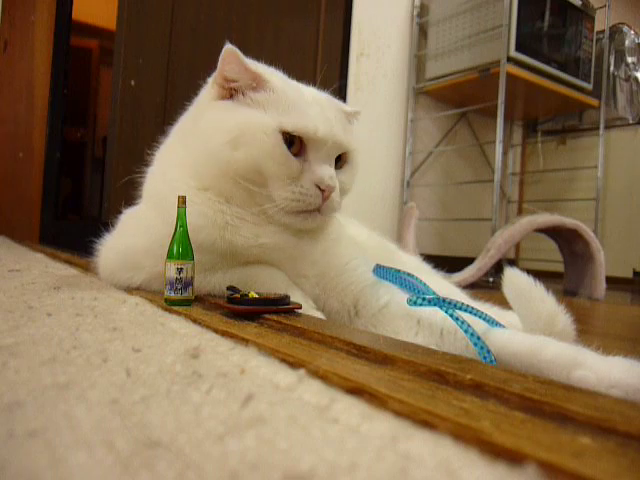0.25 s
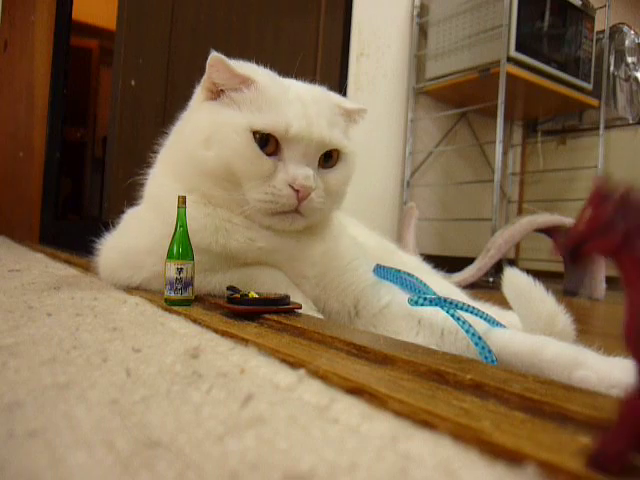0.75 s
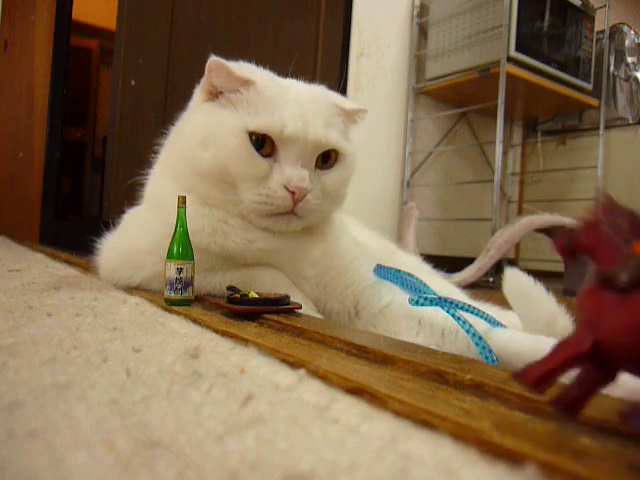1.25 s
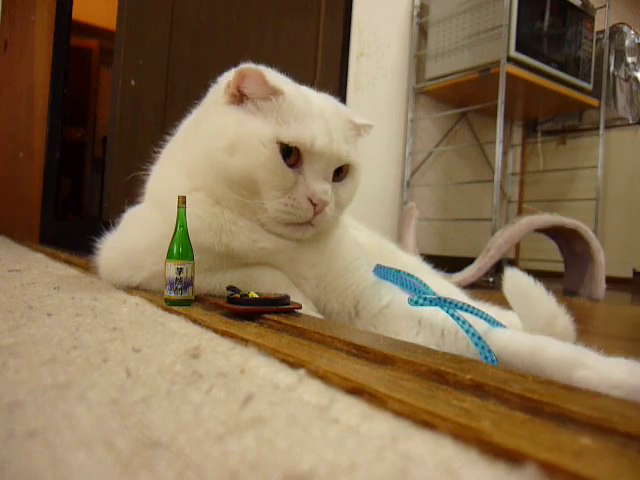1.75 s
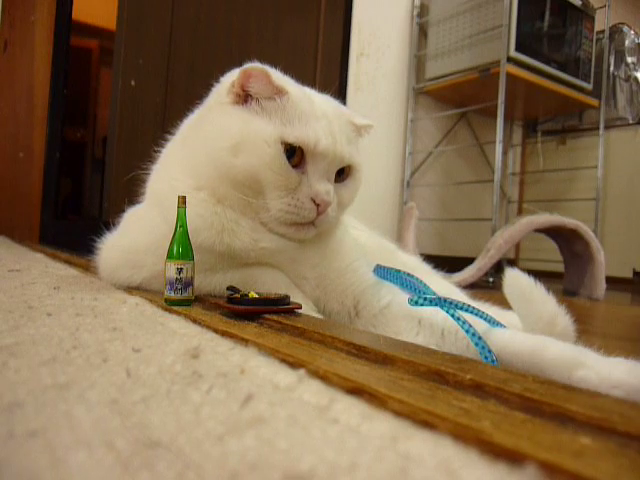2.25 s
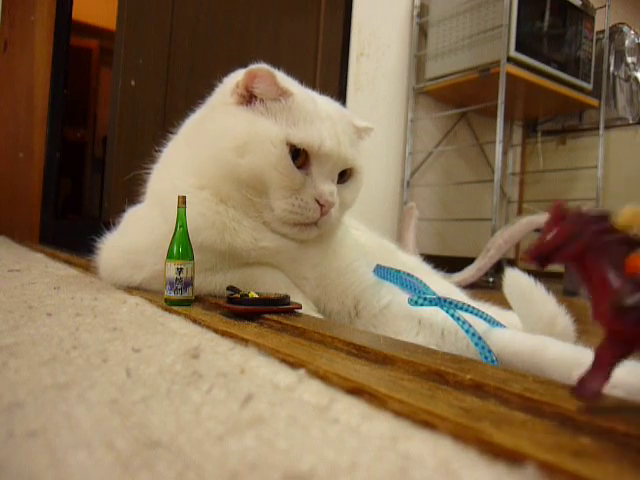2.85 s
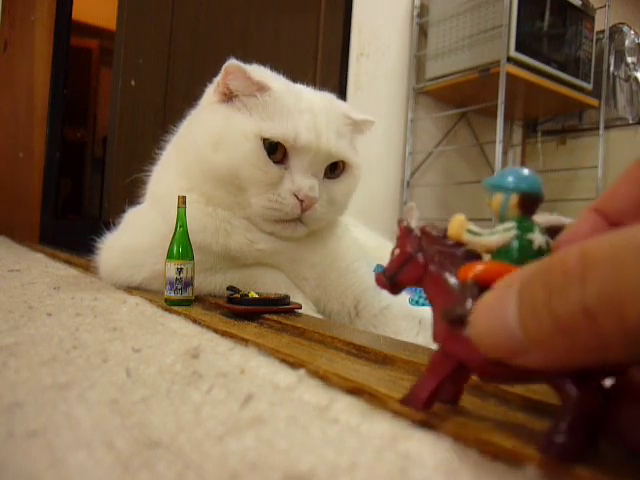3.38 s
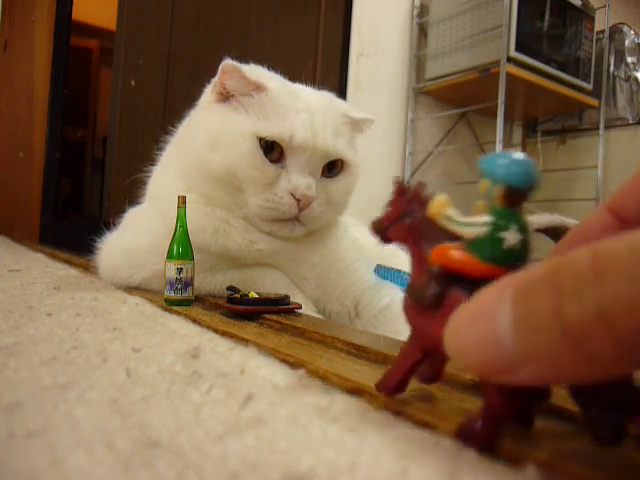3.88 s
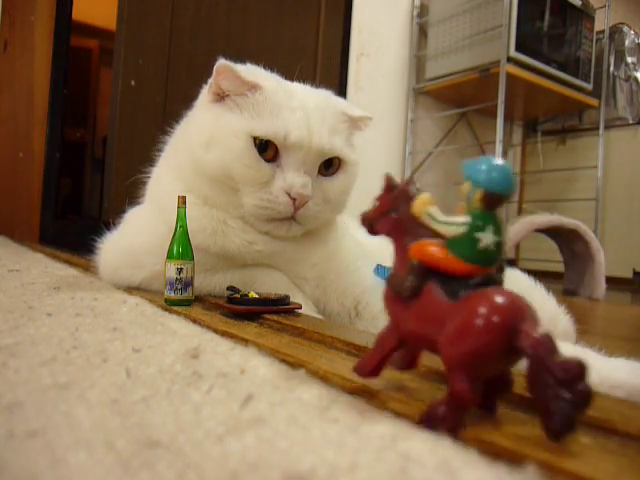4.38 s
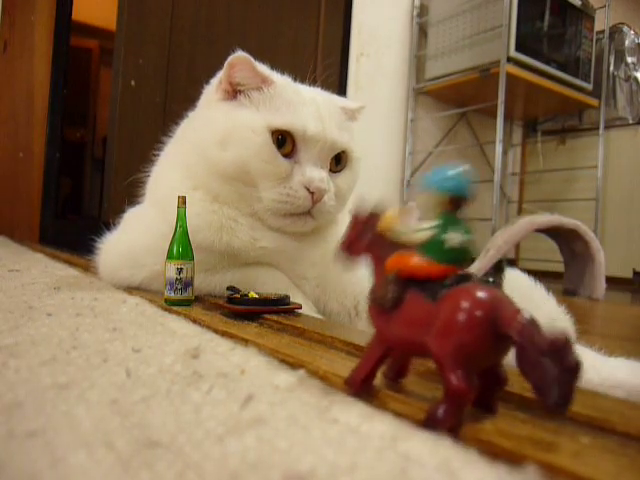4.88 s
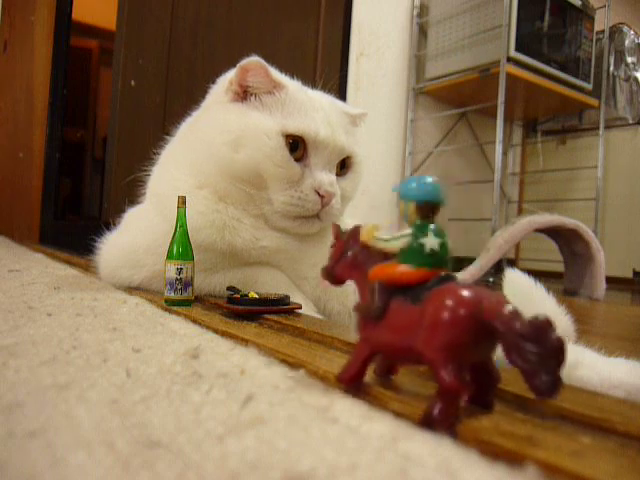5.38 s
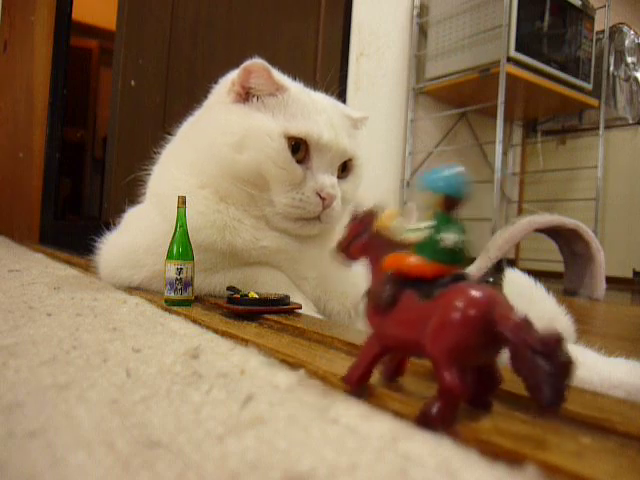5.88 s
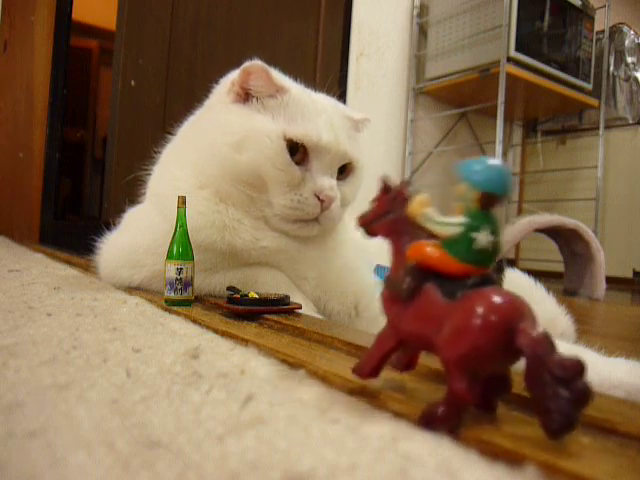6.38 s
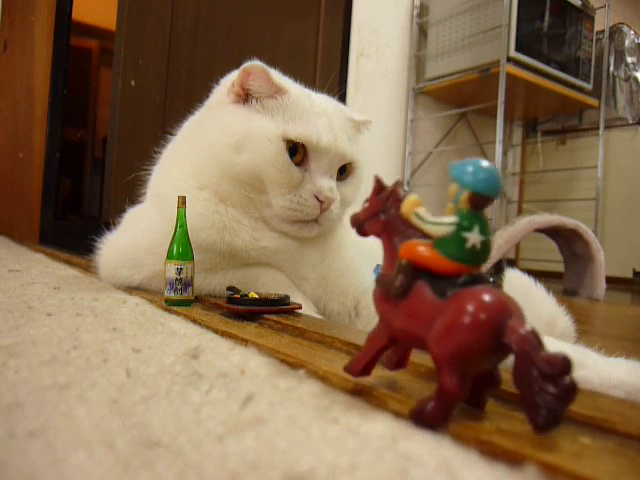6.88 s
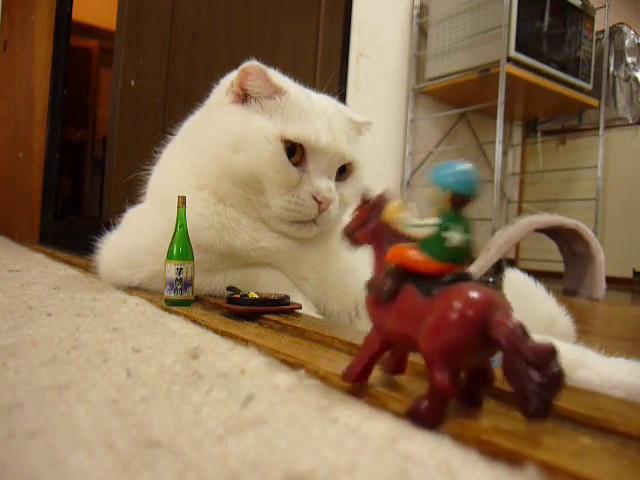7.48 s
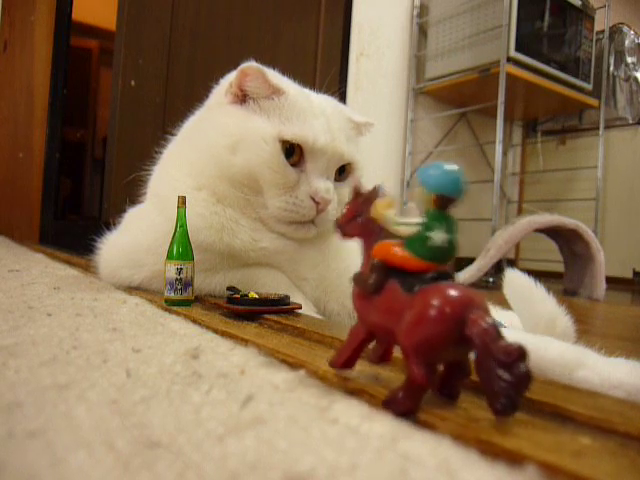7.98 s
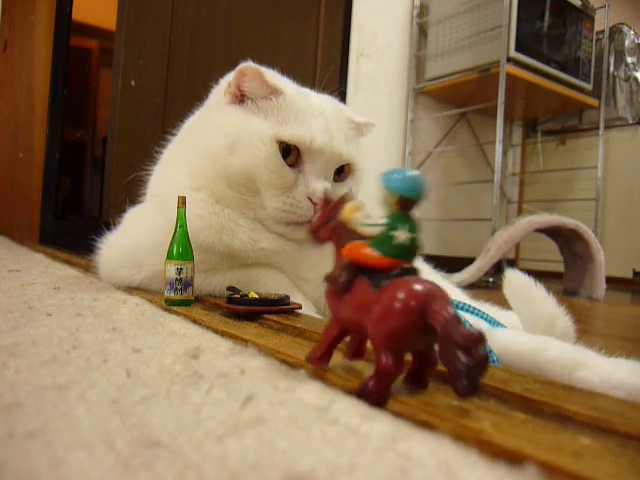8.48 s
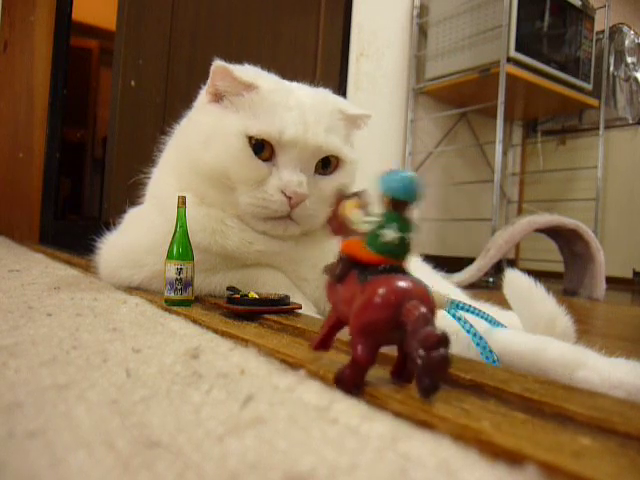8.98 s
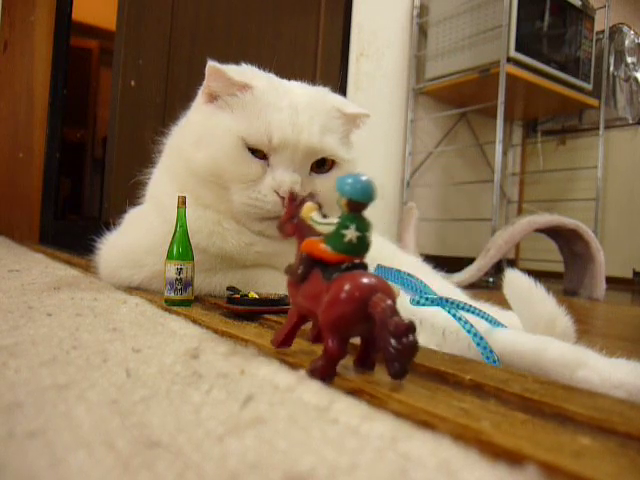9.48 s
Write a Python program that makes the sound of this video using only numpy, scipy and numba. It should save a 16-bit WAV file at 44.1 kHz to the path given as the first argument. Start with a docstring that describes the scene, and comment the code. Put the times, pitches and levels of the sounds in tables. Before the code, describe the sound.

In a small room with a low fan-like rumble and faint hum, a wind-up plastic horse is put on a wooden board, rattling and knocking over with hard clacks. After a quieter pause with light scrapes and handling clicks, it starts hopping in a rapid, slightly uneven rhythm, each hop a dull catch, two bright ticks and a woody tap. Close camera microphone, dull treble, light hiss.

```python
"""A clockwork toy horse is set down, knocked over, set down again and hops along a wooden board near a camera.
Its plastic works tick as short swelling tones of the shell; its hooves tap the board as bursts of tiny contacts.
Faint gears, scrapes and slow floor jolts join in, and the room answers with a fading noise tail.
Under it lie a fan-like rumble of shaped noise and a mains hum; the camera turns these down after loud hits.
It also dulls the treble and adds its own hiss and a faint whine."""
import sys
import numpy as np
from scipy import signal
from scipy.fft import rfft, irfft
from scipy.io import wavfile
from scipy.ndimage import uniform_filter1d
from numba import njit

SR = 44100
rng = np.random.default_rng(int(sys.argv[2]) if len(sys.argv) > 2 else 0)


def pcm_store(signal):
    """Save signal as 16-bit PCM."""
    levels = np.round(np.clip(np.atleast_2d(signal), -1, 1) * 32767)
    wavfile.write(sys.argv[1], SR, levels.astype(np.int16).T)


N = 429534  # length of the scene in samples

# The tones of the plastic shell. Each row: pitch in Hz, level in dB, swell time as a share of the push,
# share of the brightness that it takes (0 to 1).
SHELL_MODES = [(1136, -5.5, 1.4, 0.88), (1527, -6.5, 0.48, 0.025), (1879, -2.5, 0.89, 0.062),
               (2094, 1, 1.345, 0), (2421, 2.5, 0.92, 0.94), (2712, -2.5, 0.48, 0.099),
               (3066, -7, 1.8, 0.94), (3322, 7, 0.92, 1), (3707, 3, 0.79, .99), (4032, 1.5, 0.62, 1),
               (4430, -7, 0.44, 0.87), (5440, -12, 0.47, 0.96)]
# The tones of the wooden board. Each row: pitch in Hz, level in dB, time to fade by 60 dB in seconds,
# share of the hardness that it takes (0 to 1).
BOARD_MODES = [(158, -15.5, 0.14, 0.42), (218, -9, 0.036, 0.08), (363, 12.5, 0.015, 0.011),
               (505, 1.5, 0.054, 0.16), (725, 15.5, 0.0094, 0.76), (810, 17, 0.0061, 0.97),
               (1050, -11.5, 0.012, 0.026), (1300, -14.5, .01, 1), (1900, -14.5, 0.0054, 0.58)]
MAIN_HZ = 2090  # reference pitch of the shell's main lower tone


def undb(db):
    """Turns decibels into a plain factor."""
    return 10 ** (np.asarray(db) / 20)


def level(x, db):
    """Scales a sound to an average (rms) level in dB."""
    return x * undb(db) / np.sqrt(np.mean(x ** 2))


def walk(rate):
    """Random values, drawn `rate` times a second and smoothed twice into a wandering curve; spread near 0.3."""
    hold = int(SR / rate)
    steps = np.repeat(rng.standard_normal(N // hold + 1), hold)
    smooth = uniform_filter1d(uniform_filter1d(steps, hold), hold)
    return 0.43 * smooth[:N]


@njit
def follow(x, start, attack, release):
    """Follows the loudness with one rate for rising and another for falling."""
    now, curve = start, np.empty(len(x))
    for i in range(len(x)):
        now += (x[i] - now) * (attack if x[i] > now else release)
        curve[i] = now
    return curve


def blows(events, strike, modes, lag_s):
    """Plays a table of blows at their peak levels; chance changes the tones so that no two blows are alike."""
    out = np.zeros(N + SR)
    for start, peak_db, *touch in events:
        chance = rng.standard_normal((3, len(modes), 1))
        hit = strike(*touch, chance)
        i = int((start + lag_s) * SR)
        out[i:i + len(hit)] += hit * undb(peak_db) / np.abs(hit).max()
    return out[:N]


def rumble():
    """Steady household noise, shaped by pitch, flutters slightly; a wavering sine makes the mains hum."""
    # The colour of the noise. Each row: pitch in Hz, relative level in dB per Hz.
    colour = np.array([(15, -54.5), (25, -15.5), (40, -10.5), (54, -15), (87, -6.5), (150, -1.5),
                       (320, 0.5), (436, -3.5), (466, -5), (711, -3), (794, -7.5), (1080, -7.5),
                       (2060, -15.5), (2810, -16), (3600, -22), (5000, -36.5), (6500, -69), (11000, -120)])
    noise_db, hum_db, hum_hz = -47.5, -64, 59.5  # levels before the flutter
    hz = np.maximum(np.arange(N // 2 + 1) * SR / N, 1)
    shape = undb(np.interp(np.log(hz), np.log(colour[:, 0]), colour[:, 1]))
    noise = irfft(rfft(rng.standard_normal(N)) * shape, N)
    noise = level(noise, noise_db) * undb(0.23 * walk(5.2))
    hum = np.sin(2 * np.pi * hum_hz * np.arange(N) / SR)
    hum = level(hum, hum_db) * undb(0.83 * walk(9))
    return noise + hum


def gain_control(heard, top_db=-45, slope=0.79, attack_s=0.07, release_s=0.49):
    """The camera's gain goes down after loud hits and slowly comes up again."""
    loudness = follow(np.abs(heard), 1e-4, 1 / (attack_s * SR), 1 / (release_s * SR))
    return (1 + loudness / undb(top_db)) ** -slope


def room(x, gap_s=0.0073):
    """Dense reflections, made of fading noise, start after a short gap and die away."""
    t60_s, room_db = 0.33, -11  # time to fade by 60 dB, strength of the reflections
    t = np.arange(SR // 2) / SR
    tail = rng.standard_normal(len(t)) * 1000 ** (-t / t60_s) * (t > gap_s)
    tail /= np.sqrt(np.sum(tail ** 2))
    return undb(room_db) * signal.fftconvolve(x, tail)[:N]


def jolts(hz=36, t60=0.18):
    """Jolts carried through the floor: a low sine heaves for a few slow cycles and dies away."""
    # Each row: start in seconds, level in dB from which the jolt fades.
    jolt_rows = [(0.779, -41), (1.7, -52), (3.289, -61), (3.648, -49)]
    t = np.arange(N) / SR
    out = np.zeros(N)
    for start, db in jolt_rows:
        age = t - start
        fade = (age > 0) * 1000 ** (-np.abs(age) / t60)
        out += undb(db) * np.sin(2 * np.pi * hz * age) * fade
    return out


def scrapes(span=1.35):
    """Drags of plastic over wood and a few very short gritty clicks, made of spiky noise in a broad band."""
    # Each row: start in seconds, length in seconds, average (rms) level in dB before fading, band centre in Hz.
    scrape_rows = [(0.854, 0.037, -53.5, 3000), (1.333, .2, -59, 2540), (1.401, 0.016, -44, 2110),
                   (1.694, 0.0047, -44, 3000), (1.558, 0.079, -44, 2700), (2.207, 0.12, -56, 3040),
                   (2.34, 0.12, -54, 3130), (2.738, 0.079, -50.5, 750)]
    out = np.zeros(N)
    for start, length, db, hz in scrape_rows:
        i, n = int(start * SR), int(length * SR)
        grit = rng.standard_normal(n) ** 5  # a high power leaves a few big spikes
        band = signal.butter(3, [hz / span, hz * span], "band", fs=SR, output="sos")
        coloured = signal.sosfilt(band, grit)
        fade = np.sin(np.pi * np.linspace(0, 1, n) ** .5)  # rises fast, falls slowly
        out[i:i + n] += level(coloured, db) * fade
    return out


def gears(bright_db=-6, ms=0.58):
    """The gear train turns while the spring runs: a dense faint patter of teeth rings the shell."""
    # The loudness over time. Each row: time in seconds, average (rms) level in dB.
    gear_levels = [(.4, -92), (.5, -65), (1, -58), (1.3, -66.5), (1.7, -63), (1.8, -87), (3.4, -91),
                   (3.65, -72.5), (5, -73), (6.5, -76), (8, -75), (9.74, -73)]
    teeth = rng.standard_normal(N) ** 3
    shell = tick(bright_db, MAIN_HZ, np.zeros((3, len(SHELL_MODES), 1)), ms)
    patter = level(signal.fftconvolve(teeth, shell)[:N], 0)
    times, db = np.transpose(gear_levels)
    return patter * undb(np.interp(np.arange(N) / SR, times, db))


def tap(hard_db, ms, touch_db, chance, swell_s=0.00035):
    """A first touch on the board, then a rattle of small contacts that swells and dies; each rings the wood."""
    t = np.arange(SR // 8) / SR
    hz, db, t60, share = np.transpose(BOARD_MODES)[:, :, None]
    hz = hz * (1 + .05 * chance[1])
    gain = undb(db + share * hard_db + 2 * chance[0])
    ring = np.sum(gain * np.sin(2 * np.pi * hz * t) * 1000 ** (-t / t60), axis=0)
    ring *= 1 - np.exp(-t / swell_s)  # softens the onset
    age = t / (ms / 1000)
    rattle = rng.standard_normal(len(t)) ** 5 * age * np.exp(-age)
    rattle /= np.sqrt(np.sum(rattle ** 2))
    rattle[0] = undb(touch_db)  # the first touch
    return signal.fftconvolve(rattle, ring)[:len(t)]


def tick(bright_db, pitch_hz, chance, ms=1.1):
    """One knock on the shell: each tone swells with a push set by `ms`, then dies somewhat more slowly."""
    t = np.arange(SR // 20) / SR
    hz, db, share, bright = np.transpose(SHELL_MODES)[:, :, None]
    # the pitch moves the lower tones most, the brightness lifts the upper ones
    hz = hz * (pitch_hz / MAIN_HZ) ** (1 - bright) * (1 + .018 * chance[1])
    db = db + bright_db * bright + 3.2 * chance[0]
    age = t / (share * ms / 1000)
    swell = age ** 2 * np.exp(2 - age) / 4  # highest, at 1, when age is 2
    tones = np.sin(2 * np.pi * hz * t + np.pi * chance[2])
    return np.sum(undb(db) * tones * swell, axis=0)


def hops():
    """Each hop: a dull click of the catch, two ticks, a landing and a bounce; returns shell ticks and board taps."""
    # Each row: times in seconds of the catch, first tick, second tick and landing, peak level in dB of each
    # of these four, brightness in dB of the first tick and of the second tick.
    hop_rows = [(3.97, 4.077, 4.124, 4.137, -41.5, -29, -28, -26.5, -6.5, 1),
                (4.2228, 4.296, 4.3727, 4.401, -44, -30.5, -30, -33, -8.5, -2),
                (4.4787, 4.57, 4.6518, 4.68, -41.5, -33, -28, -29, -10.5, -9),
                (4.771, 4.8426, 4.9242, 4.951, -42.5, -30.5, -28, -30, -8, -16),
                (5.058, 5.1202, 5.1979, 5.225, -39.5, -27, -27.5, -30, -5, -8),
                (5.3347, 5.3948, 5.4658, 5.494, -35, -28, -28.5, -35, -9, -11),
                (5.597, 5.6608, 5.7442, 5.773, -40.5, -25, -27.5, -31.5, -13, -7),
                (5.88, 5.942, 6.0276, 6.052, -40.5, -28.5, -28, -34.5, -4, -9.5),
                (6.168, 6.2192, 6.305, 6.335, -37, -30, -29.5, -30, -4, -10.5),
                (6.4495, 6.5058, 6.5772, 6.603, -40, -25, -28, -29.5, -9.5, -3.5),
                (6.7057, 6.77, 6.8433, 6.873, -38.5, -28, -30, -30.5, -9, -5),
                (6.968, 7.0377, 7.1113, 7.137, -45, -28, -28, -34, -8, -6.5),
                (7.238, 7.3075, 7.3789, 7.405, -41.5, -27.5, -26.5, -28, -11.5, -4.5),
                (7.5096, 7.5793, 7.649, 7.673, -37.5, -25.5, -30, -33, -11, -8),
                (7.7705, 7.841, 7.8956, 7.947, -34.5, -27.5, -30.5, -37.5, -13.5, -7.5),
                (8.031, 8.1007, 8.1472, 8.159, -39, -27.5, -26.5, -26, -10.5, -1),
                (8.246, 8.32, 8.3906, 8.43, -41, -27, -28, -35.5, -8, -1.5),
                (8.518, 8.5854, 8.6629, 8.6905, -43, -25.5, -25.5, -30.5, -5, -8),
                (8.796, 8.861, 8.9048, 8.92, -42.5, -26.5, -25, -42, -11.5, -2),
                (9.035, 9.116, 9.1626, 9.177, -37.5, -26, -25.5, -29, -11.5, -7),
                (9.255, 9.375, 9.4198, 9.445, -37, -30, -27.5, -29.5, -3, -6),
                (9.529, 9.618, 9.6711, 9.7, -37, -26.5, -29.5, -42, -8, -10.5)]
    catch_bright, land_bright = -20.5, -13.5  # dB added to the upper shell tones
    catch_hz, first_hz, second_hz = 2042, 2036, 2110  # pitch of the main lower shell tone
    land_hard, bounce_hard, kick_hard = -3.5, -20.5, -11.5  # dB added to the upper board tones
    land_ms, kick_ms = 5.9, 5.5  # rattle times
    land_touch, soft_touch = 2.5, -5.5  # dB of the first touch over the rattle
    ticks, taps = [], []
    for catch, first, second, land, catch_db, first_db, second_db, land_db, first_bright, second_bright in hop_rows:
        ticks += [
            (catch, catch_db, catch_bright, catch_hz),
            (first, first_db, first_bright, first_hz),
            (second - .0034, second_db - 11.5, second_bright, second_hz),  # a faint graze runs into the tick
            (second, second_db, second_bright, second_hz),
            (land + .002, land_db - 14.5, land_bright, second_hz),  # the shell clicks with the landing
        ]
        taps += [
            (land, land_db, land_hard, land_ms, land_touch),
            (land + .016, land_db - 4, bounce_hard, land_ms, soft_touch),  # a duller second contact
            # the catch and the second tick also jog the board
            (catch, catch_db - 3, kick_hard, kick_ms, soft_touch),
            (second, second_db - 12, kick_hard, kick_ms, soft_touch),
        ]
    return ticks, taps


def scene():
    """The toy's shell and board sounds with the room, over floor jolts and the ducked background."""
    # Loose knocks of the works while the toy is handled or stumbles. Each row: start in seconds,
    # peak level in dB before filtering, brightness in dB, pitch of the main lower tone in Hz.
    loose_ticks = [(0.518, -27.5, -17, 2100), (0.579, -36, -18, 2010), (0.5938, -23.5, -8, 1990),
                   (0.7706, -19, -4.5, 2060), (0.82, -27.5, -15.5, 2150), (0.8903, -23.5, -11.5, 1970),
                   (0.9324, -24.5, -5, 2130), (1.1161, -31, -13.5, 1930), (1.1477, -27, -11, 2090),
                   (1.165, -26.5, -5, 2000), (1.1916, -29.5, -13, 2030), (1.2112, -25, -9, 2160),
                   (1.3218, -30, -12, 2100), (1.34, -21, -13, 2220), (1.3787, -25.5, -16, 2395),
                   (1.4111, -27.5, -18, 2040), (1.462, -35.5, -25.5, 2150), (1.475, -31.5, -22, 1940),
                   (1.5562, -29.5, -7, 2090), (1.5756, -20, -10.5, 1940), (1.7035, -24, 4, 2080),
                   (2.179, -40.5, -3, 2000), (2.1939, -35.5, -8, 1960), (2.252, -33, -2.5, 2030),
                   (2.363, -46, -16, 1980), (2.394, -29, -4, 1940), (2.7666, -37, -28, 2050),
                   (2.8918, -47, -22, 2100), (3.2366, -29.5, -26, 2050), (3.2869, -24.5, -16, 2050),
                   (3.6504, -24.5, -10.5, 2030), (3.7637, -28, -20.5, 2044), (3.821, -26.5, -9, 2000),
                   (3.879, -28.5, -9, 2015), (4.095, -37, -12, 2000), (6.74, -42.5, -13, 2030),
                   (7.0099, -35, -11.5, 2110), (7.826, -40.5, -11, 2040), (9.595, -42.5, -16, 2030)]
    # More knocks of body and hooves on the board, before and during the hopping. Each row: start in seconds,
    # peak level in dB before filtering, hardness in dB, rattle time in ms, first touch in dB over the rattle.
    more_taps = [(0.577, -19, -0.5, 13, 6), (0.815, -31, -7, 11, -2.5), (0.853, -22, 1, 10.6, -11.5),
                 (0.948, -22.5, 0, 13, 0), (0.991, -23.5, -8, 8.7, -3), (1.114, -29, -4.5, 15, -6),
                 (1.197, -26, 1.5, 4.6, 11), (1.22, -32, -7, 8.9, -4), (1.338, -21.5, -19.5, 5.1, -1.5),
                 (1.377, -28, -4, 8, 12), (1.409, -13, -15, 8.7, 3.5), (1.45, -22, -27, 10.4, -4.5),
                 (1.474, -13, 2, 11, 10), (1.558, -18.5, -21, 2.3, -12.5), (1.575, -17.5, 3, 2.7, 7.5),
                 (1.7025, -9, -5, 4.3, 20), (2.189, -34, -19, 8.8, -5), (2.247, -32.5, -9, 23, -1),
                 (2.786, -32.5, 1.5, 8.6, 0.5), (3.235, -33.5, 2, 9.2, 6), (3.285, -25, 4, 2.5, 1),
                 (3.327, -38.5, -21, 7.1, -1), (3.642, -36, -13, 8, -15), (3.714, -29, -11, 6.9, 9),
                 (3.89, -32.5, -6, 5.1, 6), (3.933, -31, -3.5, 5.9, -4), (8.184, -28, -17, 6.2, 0),
                 (8.739, -37, -22, 5.7, 3), (9.639, -34.5, -3, 8, 0)]
    low_hz, mic_hz = 118, 4640  # bass and treble limits of the toy's sound
    hop_ticks, hop_taps = hops()
    toy = blows(loose_ticks + hop_ticks, tick, SHELL_MODES, lag_s=0)
    toy += blows(more_taps + hop_taps, tap, BOARD_MODES, lag_s=0.0015)
    toy += scrapes() + gears()
    toy = signal.sosfilt(signal.butter(4, low_hz, "high", fs=SR, output="sos"), toy)
    toy = signal.sosfilt(signal.butter(4, mic_hz, fs=SR, output="sos"), toy + room(toy))
    toy += jolts()
    # toy levels are given as they leave the gain control, so only the steady background is turned down
    return (toy + gain_control(toy) * rumble())[None]


def record(dry):
    """The camera adds a flat hiss, a faint whine and a small offset, then two filters cut the top."""
    hiss_db, whine_db, whine_hz, top_hz = -64, -87, 6222, 8800  # hiss is rms, whine is peak
    hiss = level(rng.standard_normal(N), hiss_db)
    whine = undb(whine_db) * np.sin(2 * np.pi * whine_hz * np.arange(N) / SR)
    noisy = dry + hiss + whine - .0009
    soft = signal.sosfilt(signal.butter(14, 7900, fs=SR, output="sos"), noisy)
    return signal.sosfilt(signal.ellip(10, .2, 60, top_hz, fs=SR, output="sos"), soft)


dry = scene()
out = record(dry)
pcm_store(out)
```